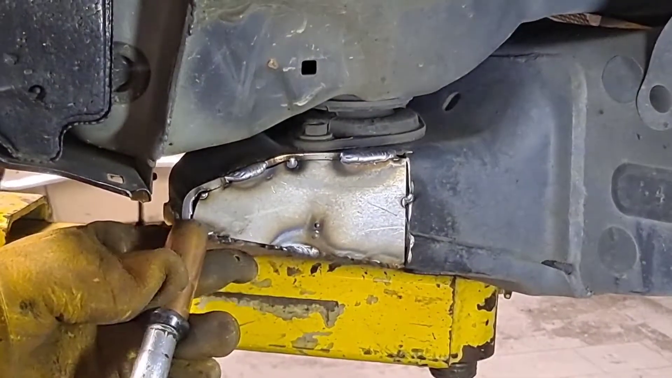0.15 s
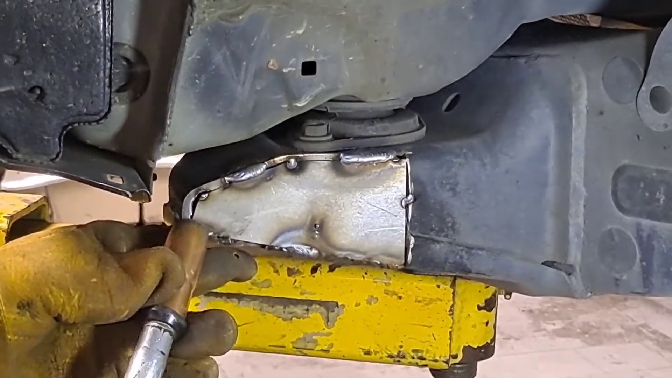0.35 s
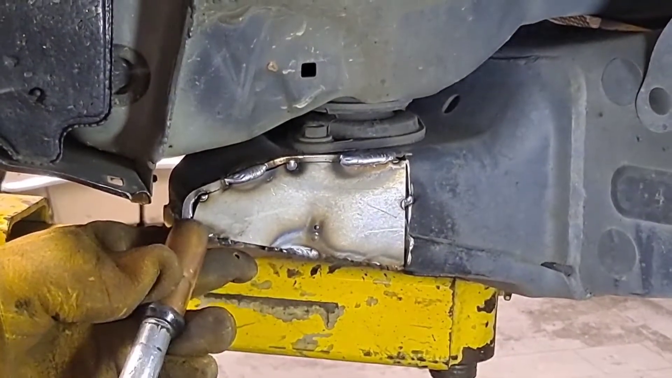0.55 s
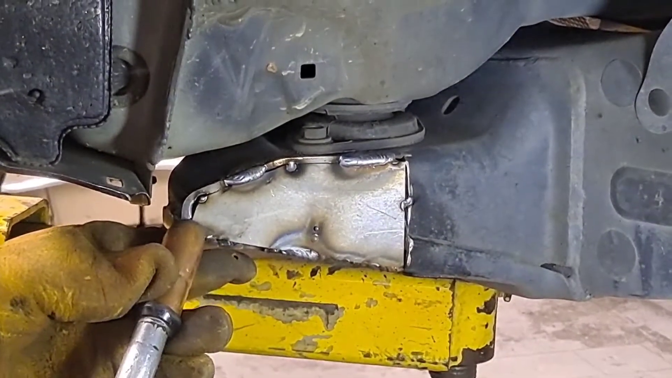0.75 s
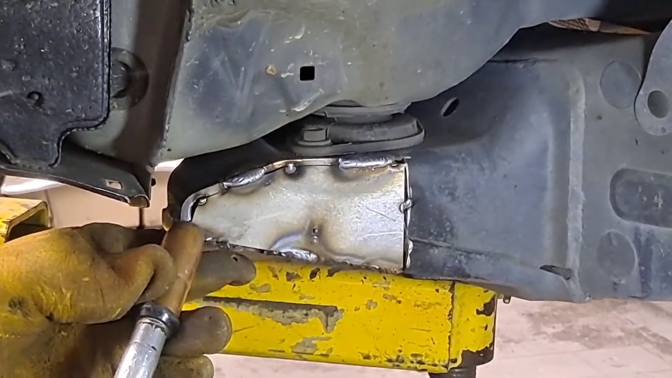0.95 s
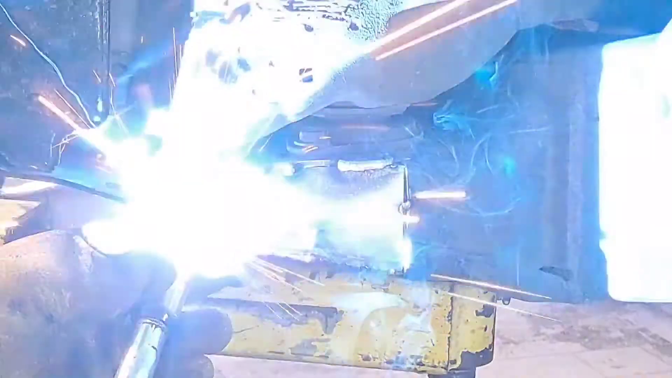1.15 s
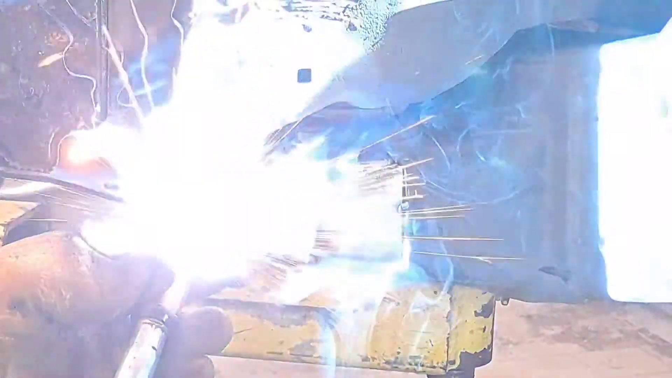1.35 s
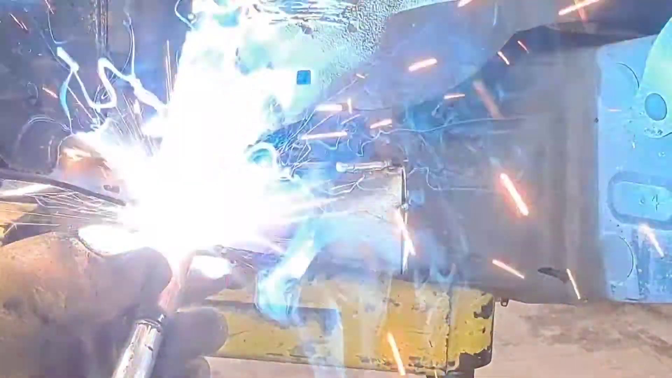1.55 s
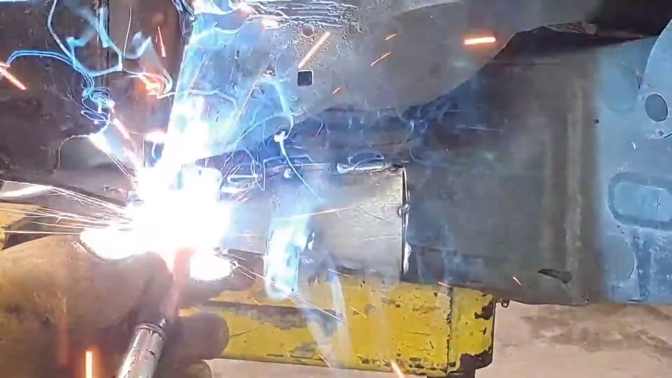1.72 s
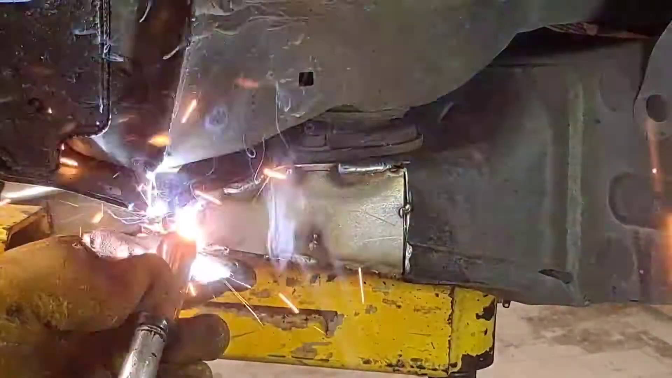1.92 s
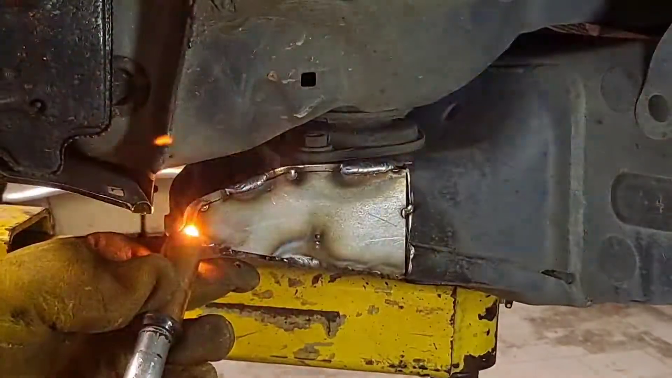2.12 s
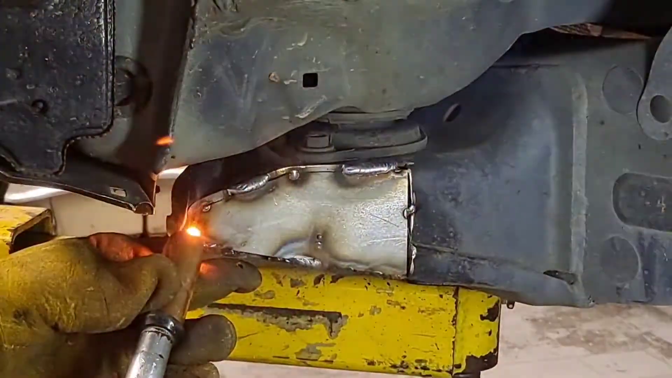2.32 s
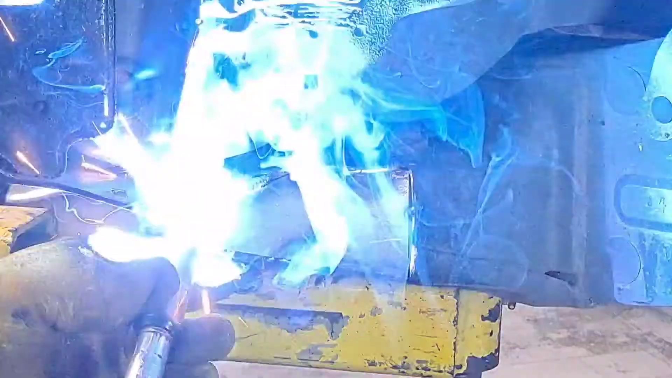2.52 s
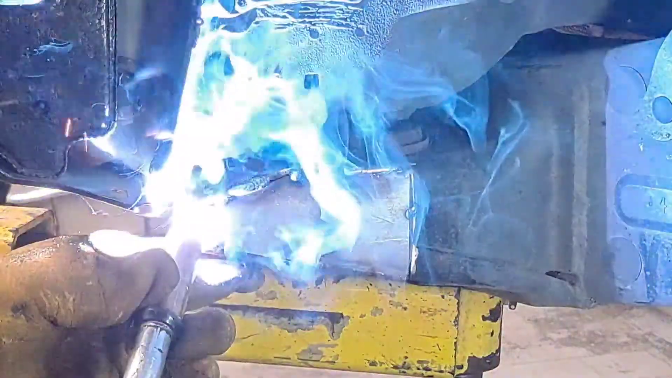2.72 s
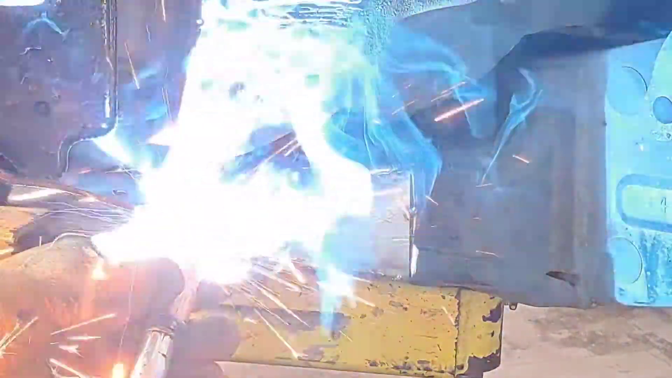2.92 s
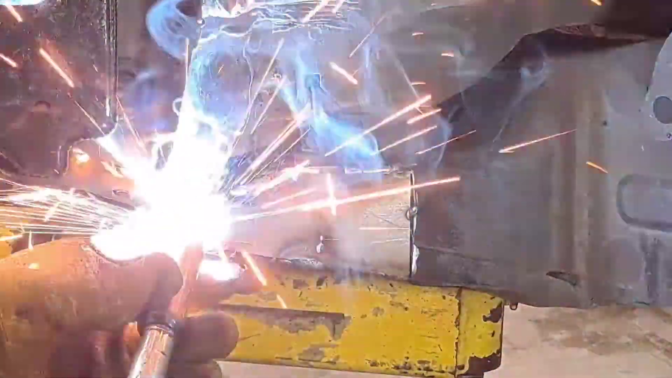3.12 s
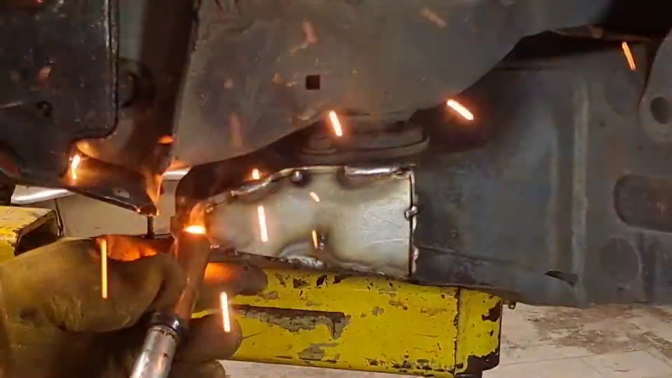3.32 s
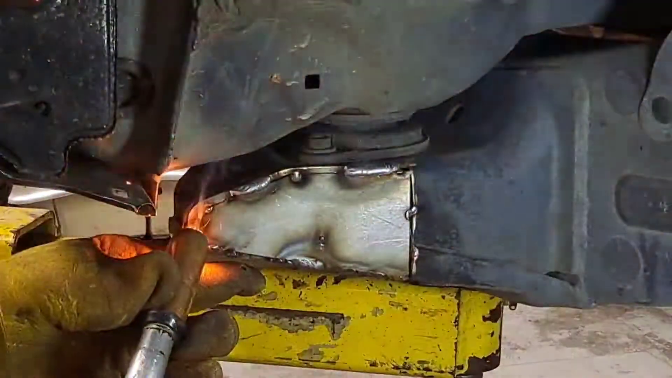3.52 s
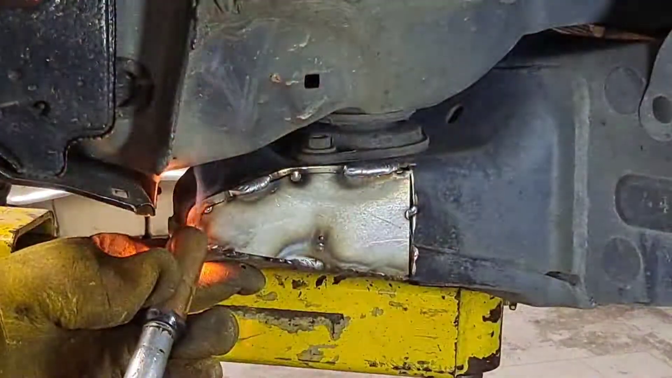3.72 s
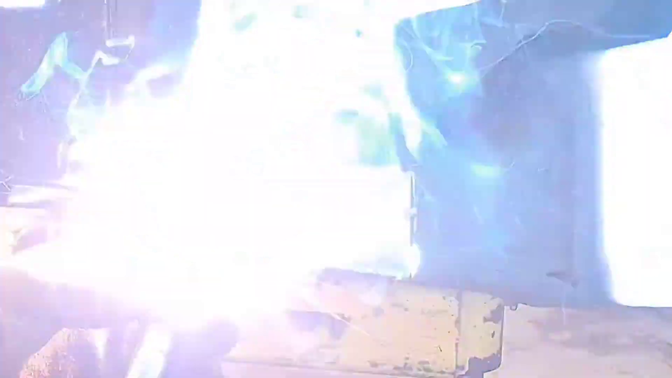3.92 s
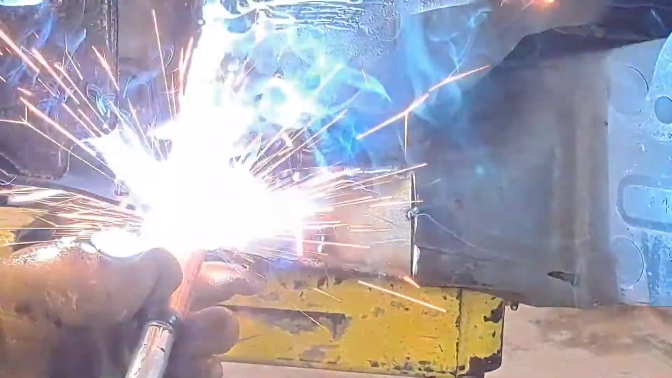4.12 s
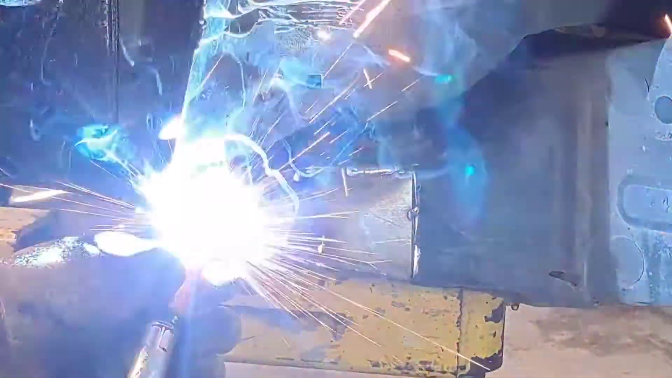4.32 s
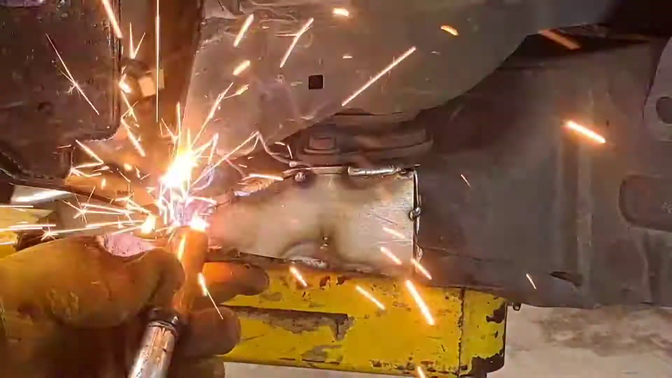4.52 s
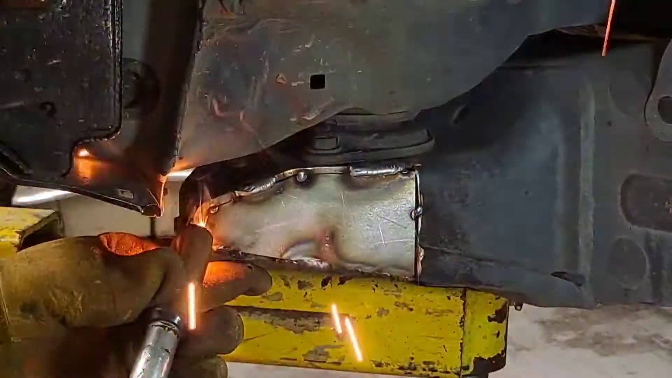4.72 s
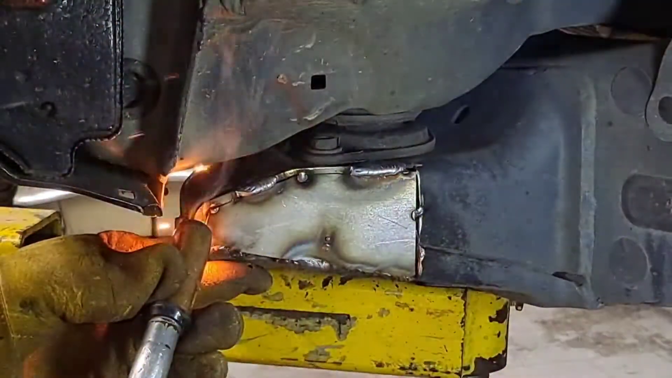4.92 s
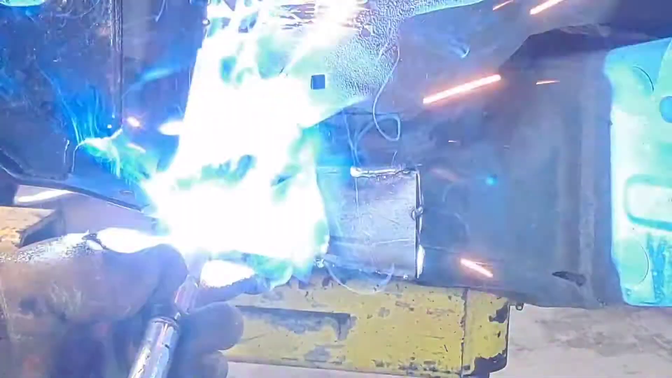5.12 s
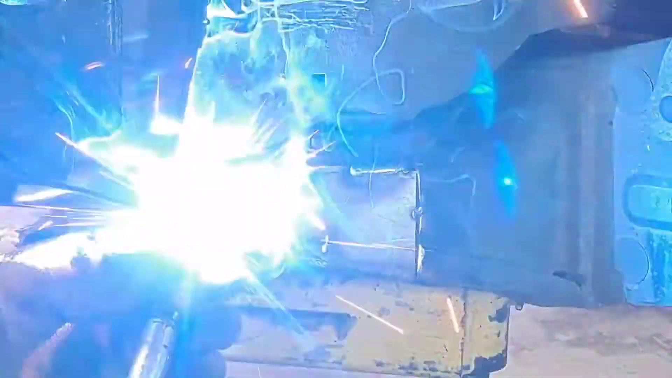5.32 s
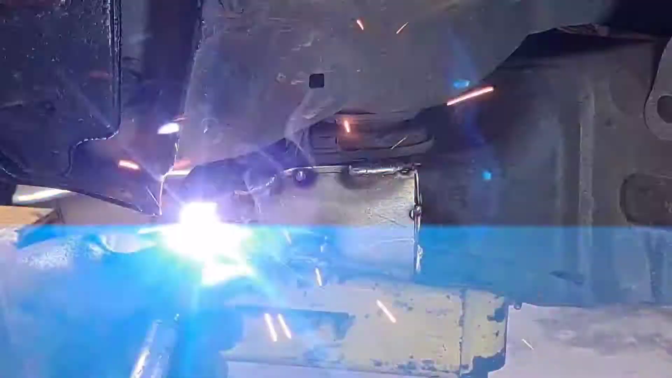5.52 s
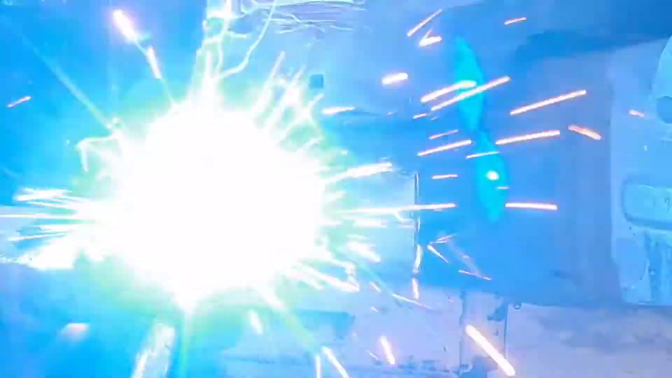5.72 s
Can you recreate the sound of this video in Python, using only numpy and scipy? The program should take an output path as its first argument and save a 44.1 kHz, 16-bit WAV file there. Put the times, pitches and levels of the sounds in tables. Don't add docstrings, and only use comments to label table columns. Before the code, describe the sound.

Very close welding on sheet steel beneath a vehicle: quiet low air noise first, then four bright, gritty bursts of buzzing and snapping. Each begins with a dull cabinet thud and puff of gas, stumbles with separate pops, then sputters at a rapid rate. Gaps are brief and very quiet, with a little metallic room tail. The phone's right side takes heavier puffs of air and low thumps.

```python
import sys
import numpy as np
from scipy import signal
from scipy.fft import rfft, irfft, next_fast_len
from scipy.io import wavfile
from scipy.ndimage import uniform_filter1d, minimum_filter1d, map_coordinates

SR = 44100
rng = np.random.default_rng(int(sys.argv[2]) if len(sys.argv) > 2 else 0)


def store_pcm(level_fs):
    pcm = np.round(np.clip(level_fs, -1, 1) * 32767).astype(np.int16)
    wavfile.write(sys.argv[1], SR, np.atleast_2d(pcm).T)


def gain_from_decibels(decibels):
    exponent = np.asarray(decibels, float) / 20
    return 10 ** exponent


N = 253826

# (time [s], level [dB])
SHOP_GAIN = [
    (0, 2),
    (1.04, 1.5),
    (1.15, 1),
    (2.3, -17),
    (3.6, -15),
    (4.9, -18),
    (5.75, -6),
]
# (frequency [Hz], level [dB])
SHOP_COLOUR = [(15, -64), (25, -43), (59, -2.5), (130, -1.5), (261, -11), (361, -14), (449, -15),
               (834, -18.5), (981, -24.5), (1550, -25), (4690, -33), (7830, -32.5), (9990, -43),
               (12700, -26.5), (15800, -31)]
# (frequency [Hz], likeness [-1 to 1])
SHOP_LIKENESS = [(60, 0.58), (290, 0.88), (640, 0.27), (1400, 0), (15000, 0.073)]
# (frequency [Hz], left over right [dB])
SHOP_BALANCE = [(60, -7.5), (200, -1.5), (1300, 3), (2400, -0.5), (6000, 2), (8100, -6.5), (10800, 5.5),
                (13300, -3.5)]
# (frequency [Hz], t60 [s])
WALL_T60 = [(100, .3), (1000, 0.31), (5000, 0.47), (10000, .24), (16000, .1)]
# (frequency [Hz], width [Hz], level [dB])
PANEL_MODES = [(3100, 760, -4), (6600, 68, 1), (7030, 37, -1), (7990, 64, -10), (8346, 150, 0.5),
               (11860, 72, 3), (12300, 280, 2.5), (13600, 2700, -7.5)]
# (frequency [Hz], level [dB])
LEFT_PORT = [(400, -9.5), (2000, 5), (5000, -3), (6000, -2), (7300, 6), (7900, 8.5), (8700, -10.5),
             (9350, -23), (9750, -5.5), (11200, -1.5), (11800, 0.5), (12600, -0.5), (14400, -7),
             (15700, 13.5)]
RIGHT_PORT = [(400, -3), (2000, 2), (5000, -0.5), (6000, 0.5), (7300, 2.5), (8000, 14), (8400, 2),
              (8800, 2.5), (9900, -3), (11300, -1.5), (12100, 2.5), (13300, 2), (14100, 9), (15700, -2.5)]
# (time [s], thud level [dB], gas level [dB], t60 [s], length [s])
TRIGGER_PULLS = [
    (1.046, -16, -18.5, 1.06, .085),
    (2.519, -39.5, -40.5, 1.02, .2),
    (3.757, -30.5, -31, 0.4, 0.29),
    (5.031, -34, -37.5, 0.37, .18),
]
# (frequency [Hz], width [Hz], level [dB])
CABINET_MODES = [(210, 31, -3.5), (297, 54, -4.5), (363, 28, -6.5), (700, 540, -23)]
# (frequency [Hz], level [dB])
GAS_COLOUR = [(600, -23), (2000, -5), (4500, 4), (6000, 4), (7200, -0.5), (16000, -9)]
# (frequency [Hz], level [dB])
HISS_COLOUR = [(1500, -38.5), (3200, -12.5), (4500, -0.5), (6500, -2.5), (16000, -2.5)]
ROAR_COLOUR = [(150, -16.5), (500, 5.5), (3000, -3.5), (5000, -12), (9000, -55.5)]
# (frequency [Hz], level [dB])
THIN_COLOUR = [(1500, -11), (3500, -2.5), (6000, 3.5), (16000, -1)]
FULL_COLOUR = [(200, 5), (1000, 0.5), (3100, -3.5), (5000, -19), (9000, -31)]
# (time [s], left over right shift [dB])
TORCH_SHIFT = [
    (1, 0),
    (2.6, -0.5),
    (4.6, -1.5),
    (5, 4.5),
    (5.75, 2.5),
]
# (fully lit [s], dies [s], hiss level [dB], swell [dB/s])
BURNS = [
    (1.07, 1.199, -27.5, 600),
    (1.237, 2.003, -23.5, 895),
    (2.68, 3.24, -24.5, 904),
    (3.96, 3.968, -27, 300),
    (4.014, 4.547, -25.5, 2004),
    (5.234, 5.505, -24.5, 900),
    (5.563, 5.615, -28, 2000),
    (5.657, 5.8, -23.5, 909),
]
FLASH_TIMES = [2.537, 3.82, 3.988, 5.0875, 5.54]
FLASH_LEVELS = [-27, -29.5, -26.5, -25, -32]
# (time [s], vigour [dB])
WELD_VIGOUR = [
    [(1.05, -3), (1.15, -2), (1.4, 1), (1.62, -5.5), (1.74, -8), (1.8, -3), (1.9, -6.5), (1.98, -1.5)],
    [(2.7, -24.5), (2.75, -7.5), (2.86, 2), (2.89, -8.5), (2.93, -1.5), (2.98, -8), (3.04, -2),
     (3.24, -6.5)],
    [(3.95, -4), (4.04, -1.5), (4.16, -5.5), (4.35, 0.5), (4.42, -10.5), (4.45, -9), (4.47, -2),
     (4.54, -3.5)],
    [(5.25, -10), (5.31, -16), (5.44, -12.5), (5.47, -2), (5.52, -26), (5.59, 3.5), (5.69, -14.5),
     (5.75, -13)],
]
# (time [s], crack level [dB], punch over crack [dB])
LONE_STRIKES = [(1.0543, -16, -1), (1.1473, -9.5, 1.5), (1.1622, -3.5, -5.5), (1.1799, -6.5, -6.5),
                (1.1975, -4, -11), (1.2396, -6, -6.5), (2.5361, -8.5, -7.5), (2.7451, -6.5, -13),
                (3.1041, -7.5, -1), (3.1319, -9.5, 4.5), (3.2008, -9, -4), (3.2194, -10.5, -0.5),
                (3.2464, -10, -6.5), (3.8187, -10, -5.5), (3.9579, -7, -1.5), (3.9858, -9, -3),
                (3.9943, -15, 1.5), (4.0089, -9.5, -4.5), (4.3613, -12.5, 1.5), (4.3783, -13, -1.5),
                (4.4729, -9.5, -3), (4.5052, -10.5, -0.5), (5.0866, -6, -5), (5.2483, 0.5, -11.5),
                (5.2692, -11.5, -7.5), (5.4277, -16, -10.5), (5.502, -9.5, -2.5), (5.5386, -4.5, -12),
                (5.5948, -7.5, -10), (5.6576, -7.5, -11)]
# (time [s], crack level [dB], punch over crack [dB])
HARD_BREAKS = [(1.124, -17, -4), (1.2547, -2.5, -18), (1.2922, -5, -12), (1.3746, -2, -9),
               (1.405, -22.5, 6.5), (5.4629, -15, -1), (1.5207, -12, -1.5), (1.5485, -9.5, 1.5),
               (1.6393, -7, -1), (1.69, -14.5, -2), (1.7689, -11.5, -5), (1.8374, -19, -6.5),
               (1.9136, -9.5, -12), (1.9704, -6, -2), (2.7605, -1.5, -6), (2.8113, -15.5, 2),
               (2.8558, -10.5, 1.5), (2.9159, -7.5, 1.5), (2.9541, -16, 9.5), (3.0067, -7, -4.5),
               (3.1241, -13, 3.5), (3.1573, -8, -7), (4.0204, -2, -5.5), (4.1504, -10, 3),
               (4.2018, -13.5, 0), (4.4658, -10, 0), (4.5213, -11, -6), (5.289, -9, -14), (5.5711, 2, -5),
               (5.677, -16.5, -11)]

FLASH_HOLD_S, FLASH_DB_PER_S = .002, 3000
FADE_DB_PER_S, ROAR_FADE_DB_PER_S = 489, 609
FLARE, ROAR_FLARE, ROAR_DB = .2, 0.8, 2.5
DROP_S, DROP_SCATTER_S, MISSED = .0085, .0008, .07
LONG_SHORT_S, LONE_S = .011, .015
DROP_DB, DROP_FLARE, LONE_DB = -9.5, 0.66, 2
THUMP_DB, THUMP_T60_S = -16, 0.4
THUMP_FLARE, THUMP_SEAM = 0.59, 1


def unit(x):
    return x / np.sqrt(np.mean(x ** 2) + 1e-20)


def along(points, hz):
    f, v = np.transpose(points)
    return np.interp(np.log(hz + 1), np.log(f + 1), v)


def curves(rows):
    s, *cols = np.transpose(rows)
    return [np.interp(np.arange(N) / SR, s, c) for c in cols]


def wobble(rate):
    knots = rng.standard_normal(int(N * rate / SR) + 4)
    return map_coordinates(knots, [np.arange(N) * rate / SR])


def filtered(x, response):
    m = next_fast_len(N + SR // 2)
    return irfft(rfft(x, m) * response(np.fft.rfftfreq(m, 1 / SR)), m)[..., :N]


def tint(x, points):
    return filtered(x, lambda f: gain_from_decibels(along(points, f)))


def resonance(f, hz, width_hz):
    return 1j * f * width_hz / (hz * hz - f * f + 1j * f * width_hz)


def train(s, db, shape):
    return signal.fftconvolve(np.bincount((s * SR).astype(int), gain_from_decibels(db), N), shape)[:N]


def pair(shared, lag=11):
    same, left, right = rng.standard_normal((3, N))
    shared = np.clip(shared, 0, 1)
    delay_s = np.array([[lag], [0]]) / SR
    both = filtered(same, lambda f: np.exp(-2j * np.pi * f * delay_s))
    return np.sqrt(shared) * both + np.sqrt(1 - shared) * np.array([left, right])


def even(x):
    return x / np.sqrt(np.abs(uniform_filter1d(x ** 2, size=SR // 300)) + 1e-9)


def shop():
    turn = lambda f: np.arccos(np.clip(along(SHOP_LIKENESS, f), -1, 1)) / 2
    spread = lambda f: gain_from_decibels(along(SHOP_COLOUR, f)) * [np.cos(turn(f)), np.sin(turn(f))]
    mid, side = filtered(rng.standard_normal((2, N)), spread)
    lean = lambda f: gain_from_decibels(along(SHOP_BALANCE, f) * [[.5], [-.5]])
    air = filtered(np.array([mid + side, mid - side]), lean)
    blades = lambda f: resonance(f, 121, 14) + .3 * resonance(f, 360, 15)
    fan = filtered(rng.standard_normal(N), blades)
    gain = gain_from_decibels(curves(SHOP_GAIN)[0] + .4 * wobble(4))
    return gain * (gain_from_decibels(-37) * unit(air) + gain_from_decibels(-45) * unit(fan))


def walls(x):
    hz, t, z = signal.stft(rng.standard_normal((2, SR // 2)), SR, nperseg=256)
    decay = gain_from_decibels(-60 * t / along(WALL_T60, hz)[:, None])
    tail = signal.istft(z * decay, SR, nperseg=256)[1]
    late = np.pad(x, ((0, 0), (200, 0)))
    return signal.fftconvolve(late, tail / np.linalg.norm(tail[0]), axes=1)[:, :N]


def ports(x):
    t = np.arange(SR // 100) / SR
    echoes = gain_from_decibels(-24 - 60 * t / .02) * rng.standard_normal((2, 2, len(t))) * (t > .0004)
    turn = 2.5 * wobble(4)
    near = x
    for part, echo in zip([np.cos(turn), np.sin(turn)], echoes):
        near = near + signal.fftconvolve(x * part, echo, axes=1)[:, :N]
    rings = lambda f: 1 + sum(gain_from_decibels(db) * resonance(f, hz, w) for hz, w, db in PANEL_MODES)
    cavities = lambda f: gain_from_decibels(np.array([along(LEFT_PORT, f), along(RIGHT_PORT, f)]) - 2.5)
    return filtered(near, lambda f: rings(f) * cavities(f))


def trigger():
    s, thud_db, gas_db, t60, length = np.transpose(TRIGGER_PULLS)[..., None]
    age = np.arange(N) / SR - s
    fading = gain_from_decibels(-60 * np.abs(age) / t60) * np.clip((length - age) / 0.064, 0, 1)
    shake = np.sum(gain_from_decibels(thud_db) * fading * np.clip(age / 0.0067, 0, 1), axis=0)
    flow = np.sum(gain_from_decibels(gas_db) * fading * np.clip(age / 0.027 + .7, 0, 1) ** 2, axis=0)
    body = lambda f: sum((-1) ** k * gain_from_decibels(db) * resonance(f, hz, w) for k, (hz, w, db) in enumerate(CABINET_MODES))
    thud = shake * unit(filtered(pair(1.0, lag=1), body))
    gas = flow * unit(tint(pair(0.38, lag=3.4), GAS_COLOUR))
    return thud, gas


def column():
    flashes = [(s, s + FLASH_HOLD_S, db, FLASH_DB_PER_S) for s, db in zip(FLASH_TIMES, FLASH_LEVELS)]
    lit, dies, burn_db, swell = np.transpose(BURNS + flashes)[..., None]
    t, vigour = np.arange(N) / SR, curves(np.vstack(WELD_VIGOUR))[0]
    rise_db = swell * np.clip(lit - t, 0, None)
    fall_db = FADE_DB_PER_S * np.clip(t - dies, 0, None)
    hiss_db = np.max(burn_db - rise_db - fall_db, axis=0)
    unlit_s = np.min(np.clip(np.maximum(t - dies, lit - t), 0, None), axis=0)
    roar_db = hiss_db - ROAR_FADE_DB_PER_S * unlit_s + ROAR_DB + ROAR_FLARE * vigour
    return hiss_db + FLARE * (vigour + 5), roar_db


def reignitions():
    contacts = np.vstack([LONE_STRIKES, HARD_BREAKS])
    start = np.transpose(HARD_BREAKS)[0][:, None]
    marks = np.concatenate([contacts[:, 0] - LONG_SHORT_S, np.transpose(BURNS)[1], contacts[:, 0]])
    stop = np.where(marks > start + .001, marks, N).min(axis=1, keepdims=True)
    step, size, hardness = rng.standard_normal((3, len(HARD_BREAKS), 30))
    s = start + np.cumsum(DROP_S + DROP_SCATTER_S * step, axis=1)
    vigour = np.interp(s, *np.vstack(WELD_VIGOUR).T)
    crack_db = DROP_DB + DROP_FLARE * vigour + 1.5 * size
    punch_db = np.minimum(vigour + 2.2 * hardness, 3)
    drops = np.stack([s, crack_db, punch_db], axis=-1)
    heard = (s < np.minimum(stop, N / SR)) & (rng.random(s.shape) > MISSED)
    every = np.vstack([contacts, drops[heard]])
    return every[np.argsort(every[:, 0])].T


def blast(s, crack_db, punch_db):
    t = np.arange(SR // 50) / SR
    blow_db = crack_db + punch_db
    flick = .5 * np.exp(-((t - .0004) / 0.001) ** 2) - np.exp(-((t - .0011) / 0.0003) ** 2)
    ragged = np.exp(-(t / 0.0036) ** 2) * (1 - np.exp(-t / 0.00091))
    dull = unit(filtered(rng.standard_normal((2, N)), lambda f: resonance(f, 330, 1000)))
    punch = train(s, blow_db, flick) * [[0], [1]]
    punch = punch + train(s, blow_db - 7.5, ragged) * dull * gain_from_decibels([[-9], [0]])
    jolt_db = .7 * blow_db + rng.normal(0, 2.5, (2, len(s)))
    lone = np.diff(s, prepend=0) > LONE_S
    kicks = train(s, jolt_db[0], [-1.]) + train(s, jolt_db[1] - 2 - 20 * lone, [1.])
    housing = lambda f: resonance(f, 63, 38) * resonance(f, 53, 320)
    ring = filtered(kicks, housing)
    slow = np.sqrt(np.abs(uniform_filter1d(ring ** 2, size=SR // 12))) + 0.11 * np.std(ring)
    flutter = gain_from_decibels(-14) * unit(filtered(rng.standard_normal(N), housing))
    dying = gain_from_decibels(-120 * np.arange(SR // 4) / SR / THUMP_T60_S)
    shaken = np.abs(train(s, 2 * THUMP_FLARE * (blow_db + 14.5), dying)) ** .5
    thump = gain_from_decibels(THUMP_DB - 9 - THUMP_SEAM * curves(TORCH_SHIFT)[0])
    return punch + thump * shaken * np.array([flutter, ring / slow])


def arc(s, crack_db, punch_db):
    hiss_db, roar_db = column()
    t = np.arange(SR // 50) / SR
    burst = (1 - np.exp(-(t / .0009) ** 2)) * (np.exp(-(t / .0026) ** 4) + .12 * gain_from_decibels(-60 * t / .025))
    crack_db = crack_db + np.clip(70 * (np.diff(s, prepend=s[0]) - .012), 0, 3.5)
    lone = np.diff(s, prepend=0) > LONE_S
    proud = crack_db - hiss_db[(s * SR).astype(int)]
    thin_db = crack_db - 5.5 - np.clip(11 - proud, 0, 6)
    thin = train(s, thin_db, burst) * even(tint(pair(0.66), THIN_COLOUR))
    full_db = crack_db + 0.44 * punch_db - 4.5 + LONE_DB * lone
    full = train(s, full_db, burst) * even(tint(pair(0.52), FULL_COLOUR))
    shock = tint(train(s, crack_db + 0.6 * punch_db - 0.5, -1. * (t == t[45])), FULL_COLOUR)
    full = (full + np.array([np.roll(shock, 11), shock])) * gain_from_decibels([[-5.5], [.6]])
    short = np.roll(train(s, 0 * crack_db, np.hanning(SR // 130)), -SR // 260)
    short += np.roll(train(s[lone], 0 * s[lone] - 9, np.hanning(SR // 90)), -SR // 95)
    lit = 1 - .6 * np.clip(short, 0, 1)
    ripple = np.sin(2 * np.pi * 120 * np.arange(N) / SR + 1.3 * wobble(25))
    spit = gain_from_decibels(1.2 * wobble(900) + 0.9 * wobble(130) + 1.2 * ripple)
    hiss = gain_from_decibels(hiss_db + 4.0) * lit * unit(tint(spit * pair(0.37), HISS_COLOUR))
    churn = gain_from_decibels(2.2 * wobble(150) + 1.2 * ripple)
    roar = gain_from_decibels(roar_db - 4.0) * lit * unit(tint(churn * pair(0.26), ROAR_COLOUR))
    return (thin + full + hiss + roar) * gain_from_decibels(curves(TORCH_SHIFT)[0] * [[.5], [-.5]])


def scene():
    thud, gas = trigger()
    pops = reignitions()
    torch = ports(arc(*pops) + gas)
    return torch + gain_from_decibels(-15.5) * walls(torch) + blast(*pops) + thud + shop()


def gated_bands(x, under_db, chance_db):
    hz, _, z = signal.stft(x, SR, nperseg=1024)
    power = (np.abs(z[:, :-1].reshape(2, -1, 8, z.shape[-1])) ** 2).mean(2)
    level = 10 * np.log10(uniform_filter1d(power, size=5, axis=2) + 1e-20)
    around = uniform_filter1d(level, size=13, axis=1)
    around = around + np.clip(.07 * (around + 80), 0, 1.5)
    keep = level - around + chance_db * rng.standard_normal(level.shape[1:]) > -under_db
    keep = minimum_filter1d(keep, size=3, axis=2)
    spared = (hz[:-1, None] < 2400) | (hz[:-1, None] > 11500)
    z[:, :-1] *= np.repeat(keep, 8, axis=1) | spared
    return signal.istft(z, SR, nperseg=1024)[1][:, :N]


def band_limit(x):
    return signal.sosfilt(signal.butter(12, 16500, fs=SR, output="sos"), x)


def record(dry):
    cut = filtered(dry, lambda f: (1j * f / (42 + 1j * f)) ** 2)
    clipped = cut / (1 + np.abs(cut / .88) ** 5) ** (1 / 5)
    thinned = gated_bands(clipped, under_db=10, chance_db=3.8)
    edge = lambda f: np.clip((15900 - f) / 250, 0, 1) ** 2
    return band_limit(filtered(thinned, edge))


dry = scene()
out = record(dry)
store_pcm(out)
```